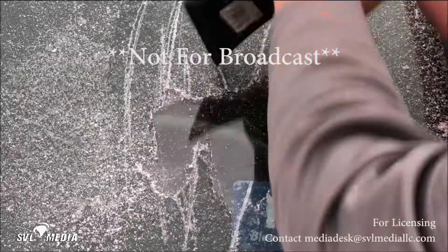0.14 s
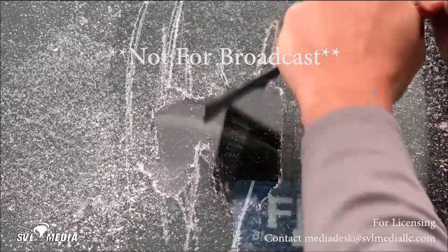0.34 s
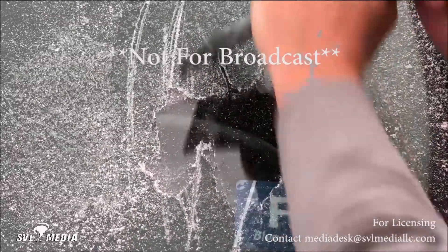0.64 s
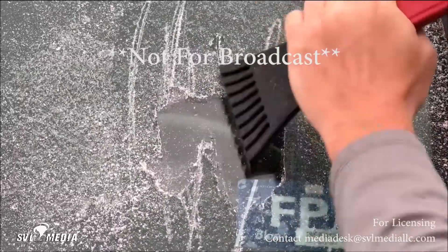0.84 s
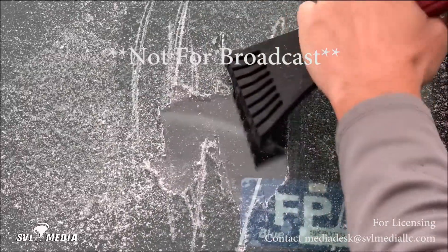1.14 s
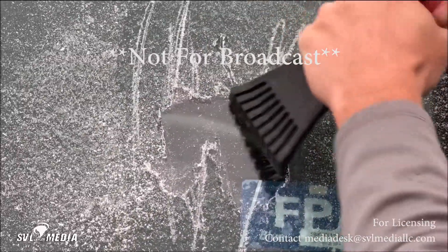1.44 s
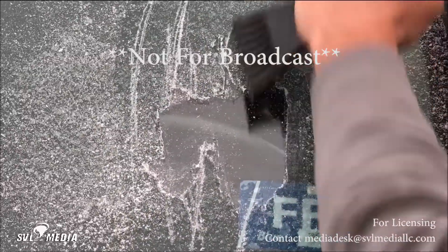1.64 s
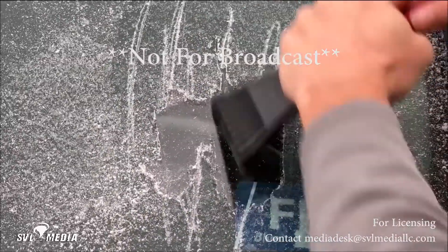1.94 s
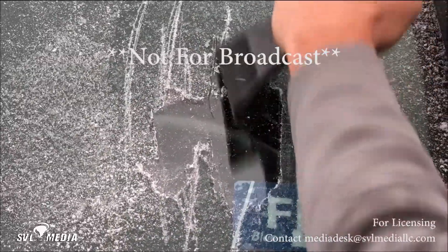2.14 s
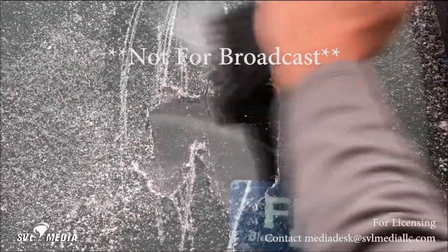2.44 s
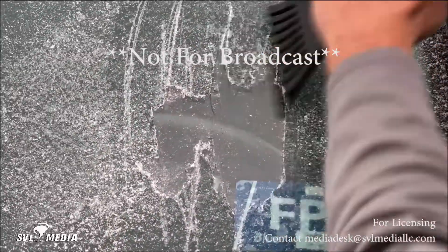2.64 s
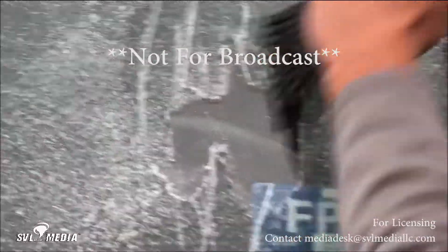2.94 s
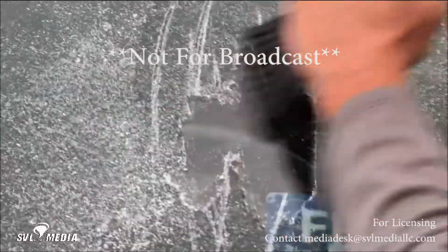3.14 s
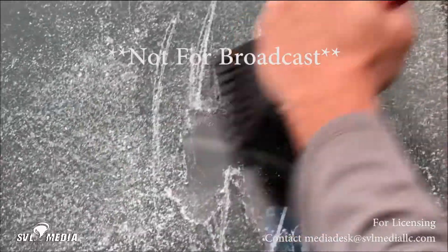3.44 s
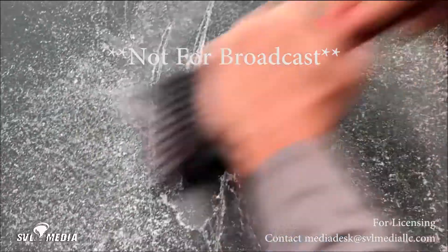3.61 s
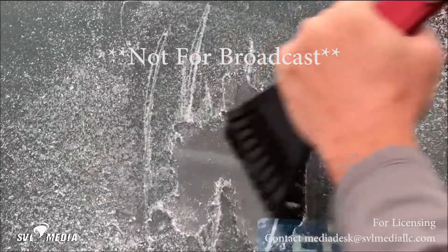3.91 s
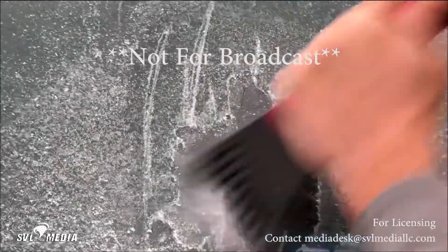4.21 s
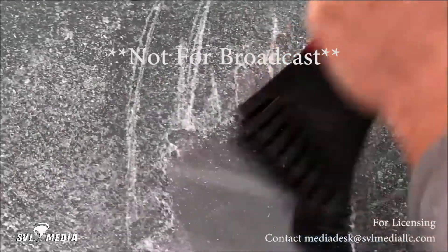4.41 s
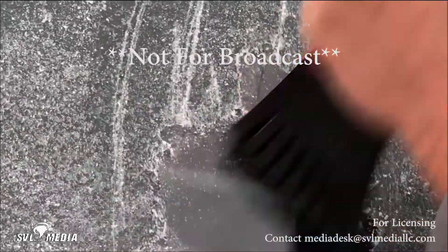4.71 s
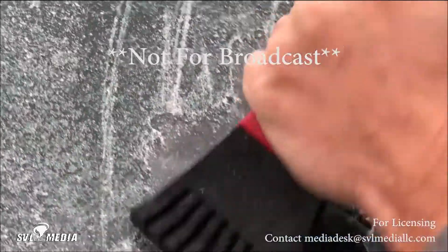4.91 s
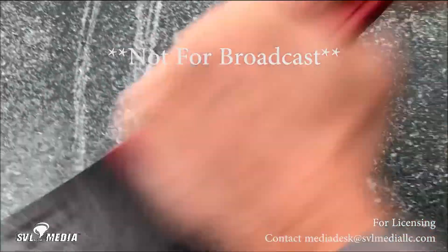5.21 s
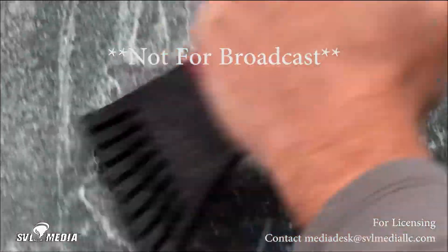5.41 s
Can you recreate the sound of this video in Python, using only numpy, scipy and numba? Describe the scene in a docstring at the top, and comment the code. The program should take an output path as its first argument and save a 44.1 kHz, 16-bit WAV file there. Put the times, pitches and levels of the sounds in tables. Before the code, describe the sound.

A plastic scraper works on an iced windshield outdoors, heard close and dry in mono, over a constant quiet low rumble. From 0 to 0.9 s, brisk rasps and sharp bites crackle brightly, with firm thumps near 0.25 and 0.6 s. From about 1 to 1.65 s the edge only brushes the glass with faint scuffs and ticks. Crisp scraping returns at 1.7 s, with a narrow ringing rasp, and continues in short strokes around 1.9 and 2.15 s. After a lull, crunchier strokes build from 2.45 s; the heaviest crackling and hollow pane knocks fall around 2.6, 2.85, 3.13, 3.45 and 3.75 s. It fades to light sliding by 4 s. A strong double scrape comes at 4.35-4.5 s, a bite at 4.69 s, then isolated scrapes near 5.0, 5.1 and 5.35 s, ending in a softer, trailing rasp.

```python
"""A plastic hand scraper rasps ice off a car windshield in quick strokes, outdoors and close by.
The edge shatters ice in dense tiny cracks: random impulses that excite the resonances
of ice and blade, while coarser jolts excite the modes of the glass pane and the thud of the hand.
Between strokes the edge slides lightly, a broadband friction noise with ticking grains.
A low rumble, noise weighted towards the bass, lies under all."""
import sys
import numpy as np
from scipy import signal
from scipy.fft import rfft, irfft
from scipy.io import wavfile
from numba import njit

SR = 44100
rng = np.random.default_rng(int(sys.argv[2]) if len(sys.argv) > 2 else 0)


def bounce(signal):
    """Save signal as a 16-bit WAV file at the path given by the first command-line argument."""
    frames = np.transpose(np.atleast_2d(signal))
    limited = np.clip(frames, -1, 1)
    pcm = np.round(limited * 32767).astype(np.int16)
    wavfile.write(sys.argv[1], SR, pcm)


def convert_level_to_amplitude(level_db):
    """Map a level in decibels to its linear amplitude factor."""
    exponent = np.asarray(level_db, float) / 20
    return 10 ** exponent


N = 245195

# spectrum of the rumble, scaled as a whole later: (frequency [Hz], relative density [dB per Hz])
RUMBLE_SPECTRUM = [(18, -39), (30, 0), (134, -5), (184, -25.5), (221, -11), (1320, -27.5), (1670, -33.5),
                   (4190, -42), (7470, -62.5), (16000, -71)]
# strokes of the edge through the ice:
# (start [s], end [s], crackle at start [dB], crackle at end [dB], pane force relative to crackle [dB])
STROKES = [(0.009, 0.053, -27, -30.5, -5), (0.112, 0.15, -34.5, -18, -6.5), (0.248, 0.302, -18.5, -26, 1.5),
           (0.426, 0.458, -15.5, -21.5, -2.5), (0.565, 0.596, -20, -13.5, -2.5),
           (0.627, 0.644, -4.5, -16.5, -7.5), (0.791, 0.837, -43, -36, -3.5),
           (0.848, 0.892, -22, -36.5, -3), (0.966, 1.046, -45.5, -52, 10), (1.128, 1.179, -29, -57, 3),
           (1.232, 1.259, -49, -42.5, 2.5), (1.336, 1.395, -46.5, -51, -1.5),
           (1.466, 1.533, -47.5, -49.5, 1), (1.642, 1.677, -41.5, -57.5, -2),
           (1.693, 1.784, -22.5, -26.5, -8), (1.785, 1.858, -23, -40, -6.5),
           (1.897, 1.991, -24.5, -26, -5.5), (2.136, 2.218, -16.5, -27, -7.5),
           (2.307, 2.324, -42, -37.5, 0), (2.343, 2.378, -33.0, -37.5, -0.5),
           (2.454, 2.543, -28, -31.5, -0.5), (2.546, 2.617, -18.5, -14.5, -2),
           (2.677, 2.769, -25.0, -26.5, -5.0), (2.799, 2.865, -29.5, -9.5, -0.5),
           (2.964, 3.053, -27, -34.5, 3.5), (3.091, 3.163, -23.5, -13.0, -1),
           (3.227, 3.278, -44.5, -32.0, 5), (3.285, 3.358, -33.5, -31.5, 6.5),
           (3.397, 3.482, -22.5, -19, 3.0), (3.559, 3.622, -51, -28.0, 6.5),
           (3.634, 3.686, -32.5, -34.5, 7.5), (3.699, 3.809, -14.0, -25.0, -0.5),
           (3.82, 3.963, -37, -28, -5), (3.996, 4.065, -36.5, -50.5, 5), (4.149, 4.196, -51.5, -51.5, 9),
           (4.326, 4.413, -24, -22.5, 1), (4.434, 4.494, -33, -10, -7.5),
           (4.594, 4.611, -25.5, -34.5, -0.5), (4.631, 4.647, -25.5, -19.5, -1.0),
           (4.945, 4.958, -41.5, -27.5, 4), (4.986, 5.037, -17, -40, 0.5), (5.088, 5.124, -29, -29, -2.5),
           (5.333, 5.396, -17, -21, -12), (5.419, 5.564, -35, -41, -1.5)]
# single bites, scuffs and ticks of the edge, from loud cracks to faint touches:
# (time [s], crackle [dB], length at 10 dB down [ms], pane force relative to crackle [dB])
TOUCHES = [(0.01, -17.5, 4.1, -9), (0.113, -23.5, 7.6, -3.5), (0.139, -15, 11, -2.5),
           (0.234, -16.5, 4.8, -4.0), (0.251, -13, 3.0, 7), (0.268, -6.5, 20.5, -11),
           (0.286, -9.5, 8.7, -9.5), (0.303, -10.0, 4.5, -8), (0.366, -50.0, 17, 14.5),
           (0.405, -15, 7.9, -2.5), (0.431, -11.5, 10.0, -5.0), (0.444, -13.5, 11, -6.5),
           (0.541, -22, 6.2, -3.5), (0.603, -15, 5.0, 4.5), (0.615, -24, 3.2, 4), (0.653, -25.5, 4, 12.5),
           (0.821, -32.5, 8.0, -12.0), (0.864, -13, 4.1, -14.0), (0.886, -26.5, 7.2, -2),
           (0.906, -33.5, 5.6, -0.5), (0.946, -29.0, 6.7, 3), (0.986, -41, 7, 10), (1.017, -26.0, 7.2, -4),
           (1.097, -43, 12.0, 8.5), (1.164, -41.0, 25.0, 1), (1.495, -29.5, 20, -6.5),
           (1.566, -45.5, 3.5, 7), (1.657, -31.0, 1.9, -15.0), (1.696, -19.0, 6.0, -10),
           (1.713, -12, 3.2, -7), (1.722, -12.5, 13, -23), (1.752, -16, 9.0, -10), (1.77, -10, 3.8, -13),
           (1.779, -11.5, 5.3, -22), (1.914, -25, 12, -4.0), (1.978, -16.5, 8.8, -6), (2.001, -32, 11, -13),
           (2.124, -16.5, 5.1, -10), (2.151, -10, 12.1, -9.0), (2.173, -15.5, 13, -8.5),
           (2.358, -16, 9, -13.5), (2.368, -13.5, 4.7, -13), (2.459, -17.5, 14.5, -12.5),
           (2.571, -9, 40, -11), (2.605, -5, 11, -9), (2.615, -10, 6.5, -5), (2.697, -10.5, 7.1, -15.0),
           (2.731, -20, 35, -8.5), (2.848, -7, 7.5, -9), (2.86, -9.5, 7, 2), (2.973, -17, 6.9, -9),
           (2.994, -24.5, 25, 0.5), (3.118, -2.5, 6.0, -6.5), (3.137, -5, 6.8, -7.5),
           (3.163, -7.5, 9.8, -4.5), (3.178, -36.5, 15, 13), (3.292, -18, 8.3, 2), (3.32, -16, 8.5, -17),
           (3.352, -14, 13.4, -10), (3.406, -13.0, 13.7, 3), (3.429, -6.0, 2.9, -19), (3.438, -5, 4.0, -6),
           (3.458, -5, 10.2, -8.0), (3.48, -11.5, 5.7, 6), (3.639, -20, 10, 4.5), (3.667, -22, 17.0, 5.5),
           (3.712, -8, 18, -4), (3.728, -7, 7.3, -9.5), (3.74, -11, 9.5, -8.0), (3.763, -5.5, 12, -10.5),
           (3.784, -19, 30, 0), (3.969, -27, 36, -1.5), (4.22, -40.5, 2.7, 21.5), (4.357, -13, 5.7, -24),
           (4.375, -6.5, 16, -10.5), (4.394, -6, 3.3, -17.0), (4.436, -19.5, 7.6, -4),
           (4.473, -11.5, 4.4, -20.0), (4.489, -10.5, 10, -12), (4.689, -8.5, 7.4, -1),
           (4.811, -44.5, 33, 1.5), (4.896, -39, 16, 12), (4.996, -8.5, 2.7, -12.0),
           (5.038, -42.5, 13, 13.5), (5.081, -13, 1.6, -15.0), (5.103, -15, 5.3, -12.5),
           (5.171, -39.5, 4.5, -9), (5.225, -49.5, 7.1, 13.5), (5.285, -44.5, 7.7, 14),
           (5.333, -7.0, 15.3, -9.5), (5.367, -13.5, 45, -9.5), (5.47, -29.5, 30, -3.5),
           (5.496, -29, 11, -3.5)]
# driving force of the light sliding between strokes: (time [s], hiss [dB], pane murmur [dB])
SLIDE = [(0, -56, -54), (.2, -58.5, -52), (.36, -54, -37.5), (.5, -52.5, -67), (.75, -55.5, -47),
         (1.0, -52.5, -58), (1.3, -60.5, -56), (1.42, -53, -48), (1.6, -64, -72), (2.05, -50.5, -46),
         (2.43, -55.5, -57), (2.9, -51, -36), (3.5, -55, -36.5), (4.1, -53.5, -54), (4.27, -64.5, -67),
         (4.55, -49.5, -43), (4.75, -56, -48), (5.2, -51, -60), (5.56, -51, -54)]
# the edge jams against a ridge of ice and thumps the pane: (time [s], relative level [dB])
THUMPS = [(0.234, -9), (0.25, 4), (0.404, -28), (0.599, -4), (0.627, -6.5), (0.653, -12), (1.128, -14.5),
          (1.503, -19), (2.138, -13), (2.562, -12), (2.6, -13), (2.849, -5), (2.859, 6), (3.099, 1.5),
          (3.133, -2.5), (3.163, -8), (3.408, -11), (3.438, 6), (3.469, 3), (3.482, 9), (3.704, 5.5),
          (3.763, -19), (4.22, -17), (4.368, -17), (4.596, -28), (4.687, -14), (4.895, -16.5), (4.99, -21),
          (5.012, -7), (5.283, -18), (5.329, -19)]
# the arm's weight lands on the pane and flexes it: (time [s], level [dB])
SHOVES = [(.26, -33), (.87, -42.5), (1.76, -33), (2.0, -31), (2.07, -44), (2.15, -25), (2.63, -19),
          (2.77, -33.5), (2.87, -22), (3.16, -25), (3.44, -17.5), (3.5, -19.5), (3.76, -15.5),
          (4.41, -28.5), (4.72, -29.5), (4.84, -37.5), (5.02, -20), (5.36, -15)]
# resonances that colour the cracking ice: (frequency [Hz], width [Hz], level [dB])
ICE_RESONANCES = [(1580, 1850, -4.5), (3184, 2190, -4), (4370, 2980, -5.5), (5904, 1270, 2),
                  (6986, 640, 3.5), (7300, 890, 3), (8010, 2020, -1.5), (11130, 520, -8.5),
                  (11700, 5500, -11), (15560, 870, -16)]
# resonances of the blade's ribs: (frequency [Hz], width [Hz], level [dB])
RIB_RESONANCES = [(4396, 190, -4), (5260, 260, -18), (5825, 157, 0), (6370, 240, -10), (7130, 270, 1),
                  (7310, 470, 1.5), (7560, 300, -9.5), (8650, 296, 4), (9390, 1300, -11), (10540, 640, 4.5),
                  (11220, 850, -10.5)]
# the blade's ring shifts with grip and angle:
# (time [s], frequency [Hz], width of the narrower stage [Hz], relative drive [dB])
BLADE_RING = [(0, 2130, 414, 0.5), (.27, 2340, 454, -11), (.43, 2294, 153.5, 5), (.63, 2190, 600, -13),
              (.85, 2330, 350, -1.5), (1.3, 2380, 350, -2.5), (1.75, 2320, 141, 2.5),
              (1.93, 2190, 201, -7.5), (2.16, 2316, 139, 4.5), (2.3, 2370, 252, 0.5),
              (2.57, 2550, 705, -21.5), (3.0, 2570, 720, -2), (3.13, 2460, 735, -23),
              (3.62, 2370, 740, -2.5), (3.72, 2350, 600, -13), (4.0, 2370, 508, -8.5), (4.6, 2440, 666, -2),
              (5.1, 2530, 710, 3), (5.36, 2360, 406, -2.5), (5.56, 2350, 453, 6.5)]
# brittleness of the ice, heard as treble: (time [s], change above the corner [dB])
BRITTLENESS = [(0, -5.5), (.6, -6), (1.7, -4.5), (2.0, -5), (2.5, -0.5), (3.3, -2.5), (3.6, 0.5),
               (3.9, -11), (4.35, 1), (4.5, -8), (5.0, 2), (5.56, -3.5)]
# modes of the glass pane: (frequency [Hz], level [dB], decay by 60 dB [s])
PANE_MODES = [(198.4, -2.5, 0.56), (230, -4.5, 0.27), (270, -1.5, 0.15), (350, -3.5, 0.063),
              (413, -4, 0.097), (496.6, -4, 0.055), (560, -2, 0.03), (618.5, -1.5, 0.047), (717, -3, 0.029),
              (844, -7.5, 0.065), (956, -9, 0.031), (986, -8, 0.035), (1150, -13, 0.11), (1222, -10, 0.096),
              (1361, -16.5, 0.033), (1528, -8, 0.06), (1706, -14.5, 0.11), (1910, -11, 0.02)]
# dull thud under the pressing hand: (frequency [Hz], width [Hz], level [dB])
KNOCK_RESONANCES = [(333, 214, -2.5), (600, 482, 1.5), (1170, 1940, -5)]
# lowest resonances, heard as the pane flexes: (frequency [Hz], width [Hz], level [dB])
FLEX_RESONANCES = [(79, 52, -5.5), (108.2, 34.6, -4), (152, 28.5, 3)]

GRIP_MS, LET_GO_MS = 2.37, 4.15  # a level stroke gains and loses 10 dB in these times
EASE_IN_MS_PER_DB = 0.5  # a stroke that swells also starts more gently
TOUCH_RISE_SHARE = 0.31  # part of a single touch's length spent rising
FRONT_POWER, TAIL_POWER = 2.03, 1.46  # how rounded the two sides of a push are
CRUMBS_DB, CRUMBS_DB_PER_S = -27, 371.5  # loose crumbs trickle on after each stroke and touch
STUTTER_HZ, STUTTER_DB = 88, 3.0  # the edge sticks and slips at random within a stroke
CONTACT_MS, THUMP_GAIN_DB = 1.08, 18  # length of a thump; gain of all thumps
SHOVE_MS = 23.5  # half width of a shove at 10 dB down
FLEX_SHARE_DB, FLEX_REST_DB = -24, -47.5  # flexing that follows the force on the pane; at rest
BRITTLE_HZ = 9500  # corner above which brittleness acts
SNAP_DB, SNAP_HZ = -18.5, 7000  # sharp snaps of thin ice, heard above this corner
GRIT_DB = -12  # stray grains tick under the sliding edge, against its hiss
RUMBLE_DB = -43.5
BASS_CUT_HZ, TOP_CUT_HZ = 68, 21000


def rms_one(x):
    """Normalisation to unit mean power."""
    return x / np.sqrt(np.mean(x ** 2) + 1e-20)


def in_time(rows):
    """Linear interpolation: the columns of a curve at every sample."""
    s, *columns = np.transpose(rows)
    return [np.interp(np.arange(N) / SR, s, c) for c in columns]


def drift_gain(rate_hz, spread_db):
    """Random modulation: noise through two equal low-pass poles gives a gain that wanders in dB."""
    step = 40  # samples between points of the curve
    r = np.exp(-2 * np.pi * rate_hz * step / SR)
    noise = rng.standard_normal(N // step + 2002)
    slow = signal.lfilter([1], [1, -2 * r, r * r], noise)[2000:]  # past the filter's onset
    gain = convert_level_to_amplitude(spread_db * rms_one(slow))
    return np.interp(np.arange(N) / step, np.arange(len(slow)), gain)


def cracks(per_s, spread_db):
    """Shot noise: impulses at random instants, of random sign and very uneven size; rms 1."""
    sizes = convert_level_to_amplitude(spread_db * np.minimum(rng.exponential(1, N), 5)) * rng.choice([-1, 1], N)
    return rms_one(sizes * (rng.random(N) < per_s / SR))


def body(force, modes, wander_db, wander_hz):
    """Modal superposition: parallel resonances, each with a wandering drive; unit noise gives about rms 1."""
    out, power = 0, 0
    for k, (hz, width_hz, level_db) in enumerate(modes):
        r = np.exp(-np.pi * width_hz / SR)
        poles = [1, -2 * r * np.cos(2 * np.pi * hz / SR), r * r]
        drive = force * convert_level_to_amplitude(level_db) * drift_gain(wander_hz, wander_db) + 1e-18
        ring = signal.lfilter([1, 0, -1], poles, drive) * (1 - r * r) / 2
        out = out + (-1) ** k * ring  # neighbours in opposite phase
        power += convert_level_to_amplitude(2 * level_db) * (1 - r * r) / 2
    return out / np.sqrt(power)


def highpass(x, corner_hz):
    """Second-order Butterworth response: maximally flat above the corner."""
    return signal.sosfilt(signal.butter(2, corner_hz, "high", fs=SR, output="sos"), x)


def rumble():
    """Spectral shaping: random noise weighted towards the bass, its level wandering slowly."""
    hz, level_db = np.transpose(RUMBLE_SPECTRUM)
    grid = np.maximum(np.arange(N // 2 + 1) * SR / N, 1)
    colour = convert_level_to_amplitude(np.interp(np.log(grid), np.log(hz), level_db))
    noise = rms_one(irfft(rfft(rng.standard_normal(N)) * colour, N))
    return convert_level_to_amplitude(RUMBLE_DB) * drift_gain(1.2, spread_db=3.0) * noise


def flexing(on_pane):
    """Quasi-static bending: a swell for each shove, a share of the scraping force, a little at rest."""
    t = np.arange(N) / SR
    swells = 0
    for s, level_db in SHOVES:
        fall_db = 10 * np.minimum((1000 * (t - s) / SHOVE_MS) ** 2, 20)
        swells = swells + convert_level_to_amplitude(level_db - fall_db)
    return swells + convert_level_to_amplitude(FLEX_SHARE_DB) * on_pane + convert_level_to_amplitude(FLEX_REST_DB)


def thumps():
    """Impact with finite contact time: short half-sine pushes of given impulse."""
    force = np.zeros(N)
    push = np.sin(np.linspace(0, np.pi, int(CONTACT_MS * SR / 1000)))
    for s, level_db in THUMPS:
        at = int(s * SR)
        force[at:at + len(push)] += convert_level_to_amplitude(level_db + THUMP_GAIN_DB) * push / push.sum()
    return force


def contact_force():
    """Contact force on ice and pane: rounded pushes, each with a trickle after; the strongest rules."""
    pushes = []
    for start, end, first_db, last_db, pane_db in STROKES:
        rise_ms = GRIP_MS + EASE_IN_MS_PER_DB * max(last_db - first_db, 0)
        pushes.append((start, end, first_db, last_db, rise_ms, LET_GO_MS, pane_db, 1))
    for s, level_db, ms, pane_db in TOUCHES:
        rise_ms, fall_ms = TOUCH_RISE_SHARE * ms, (1 - TOUCH_RISE_SHARE) * ms
        pushes.append((s, s, level_db, level_db, rise_ms, fall_ms, pane_db, 0))
    force_db = np.full((2, N), -140.)
    stutter_db = 20 * np.log10(drift_gain(STUTTER_HZ, STUTTER_DB))
    for start, end, first_db, last_db, rise_ms, fall_ms, pane_db, stutters in pushes:
        at = slice(max(int((start - .05) * SR), 0), min(int((end + .15) * SR), N))
        t = np.arange(at.start, at.stop) / SR
        before_ms = 1000 * np.maximum(start - t, 0)
        after_ms = 1000 * np.maximum(t - end, 0)
        front_db = -10 * (before_ms / max(rise_ms, .5)) ** FRONT_POWER
        tail_db = -10 * (after_ms / max(fall_ms, .5)) ** TAIL_POWER
        crumbs_db = CRUMBS_DB - CRUMBS_DB_PER_S * after_ms / 1000
        shape_db = np.interp(t, [start, end + 1e-6], [first_db, last_db]) + front_db
        shape_db = shape_db + np.maximum(tail_db, crumbs_db) + stutters * stutter_db[at]
        force_db[:, at] = np.maximum(force_db[:, at], shape_db + np.array([[0], [pane_db]]))
    return convert_level_to_amplitude(force_db)


def pane(on_pane, murmur):
    """Plate vibration: jolts, thumps and murmur excite the glass modes, a dull knock and slow flexing."""
    jolts = cracks(per_s=2500, spread_db=3.5) * on_pane
    blows = thumps()
    # a mode's width follows from its decay time
    modes = [(hz, 3 * np.log(10) / np.pi / t60, level_db) for hz, level_db, t60 in PANE_MODES]
    glass_force = jolts + convert_level_to_amplitude(-10.0) * blows + convert_level_to_amplitude(-4.5) * murmur
    glass = body(glass_force, modes, wander_db=3.5, wander_hz=7.8)
    knock = body(jolts + convert_level_to_amplitude(5.0) * blows, KNOCK_RESONANCES, wander_db=2.5, wander_hz=21)
    flex_force = rng.standard_normal(N) * flexing(on_pane) + convert_level_to_amplitude(-26.5) * blows
    flex = body(flex_force, FLEX_RESONANCES, wander_db=3.5, wander_hz=14.0)
    return convert_level_to_amplitude(1.0) * glass + convert_level_to_amplitude(-1.0) * knock + convert_level_to_amplitude(-1.5) * flex


@njit
def moving_ring(force, r, turn):
    """Time-varying resonator: centre and width change sample by sample."""
    out = np.zeros(len(force))
    for i in range(2, len(force)):
        drive = force[i] - force[i - 2]
        out[i] = drive + 2 * r[i] * np.cos(turn[i]) * out[i - 1] - r[i] * r[i] * out[i - 2]
    return out


def blade(cracking, sliding):
    """Cascaded resonance: the blade rings in one band with steep skirts, a wide stage then a narrow one."""
    hz, width_hz, relative_db = in_time(BLADE_RING)
    ring = cracking * convert_level_to_amplitude(relative_db) + sliding
    for widening in (4.0, 1):
        r = np.exp(-np.pi * widening * width_hz / SR)
        ring = moving_ring(ring * (1 - r * r) / 2, r, 2 * np.pi * hz / SR)
    return ring * np.sqrt(SR / np.pi / width_hz)  # evens out loudness as the width moves


def ice(cracking, sliding, on_ice):
    """Brittle fracture: cracks and friction excite ice and ribs, and sharp snaps add treble."""
    force = cracking + sliding
    sound = convert_level_to_amplitude(3.0) * body(force, ICE_RESONANCES, wander_db=2.0, wander_hz=21.0)
    sound = sound + convert_level_to_amplitude(-5.5) * body(force, RIB_RESONANCES, wander_db=3.0, wander_hz=19)
    brightness = convert_level_to_amplitude(in_time(BRITTLENESS)[0])
    corner = signal.butter(2, BRITTLE_HZ, "high", fs=SR, output="sos")
    treble = signal.sosfiltfilt(corner, sound)  # zero phase, so that it adds in step
    sound = sound + (brightness - 1) * treble
    snaps = cracks(per_s=630, spread_db=8.5) * on_ice * brightness
    return sound + convert_level_to_amplitude(SNAP_DB) * highpass(snaps, SNAP_HZ)


def scraper():
    """Common excitation: one stream of cracks drives ice and blade; coarser jolts drive the pane."""
    hiss, murmur = convert_level_to_amplitude(in_time(SLIDE))
    on_ice, on_pane = contact_force()
    cracking = cracks(per_s=9000, spread_db=3.5) * drift_gain(250, spread_db=3.0) * on_ice
    rub = rng.standard_normal(N) * drift_gain(50, spread_db=1.0)
    rub = rub + convert_level_to_amplitude(GRIT_DB) * cracks(per_s=73, spread_db=5.5)
    sliding = rub * hiss
    ringing = convert_level_to_amplitude(-6.0) * blade(cracking, convert_level_to_amplitude(3.0) * sliding)
    return ice(cracking, sliding, on_ice) + ringing + pane(on_pane, rub * murmur)


def scene():
    """Superposition: the scraper on the pane over the rumble, in one channel."""
    return (rumble() + scraper())[None]


def low_pass(x):
    """Removes everything above the highest recorded frequency."""
    return signal.sosfilt(signal.butter(12, 16970, fs=SR, output="sos"), x)


def record(dry):
    """Band limiting and soft saturation: deepest bass cut, peaks rounded, top cut."""
    mix = highpass(dry, BASS_CUT_HZ)
    mix = .9 * np.tanh(mix / .9)
    # order 10, 0.5 dB ripple, 28 dB stopband
    mix = signal.sosfilt(signal.ellip(10, .5, 28, TOP_CUT_HZ, fs=SR, output="sos"), mix)
    return low_pass(mix)


dry = scene()
out = record(dry)
bounce(out)
```